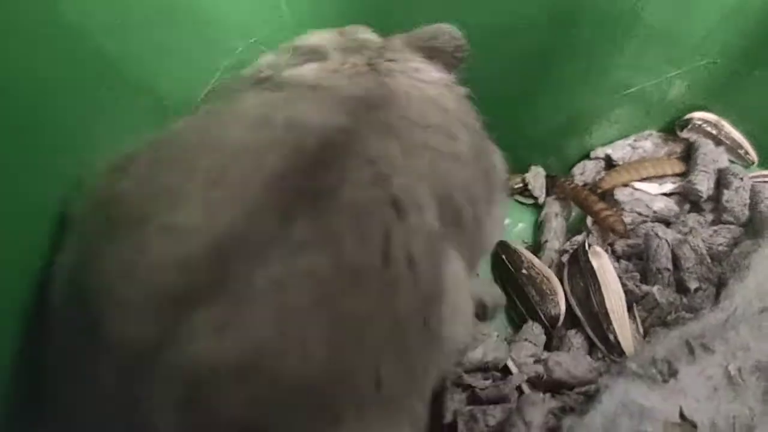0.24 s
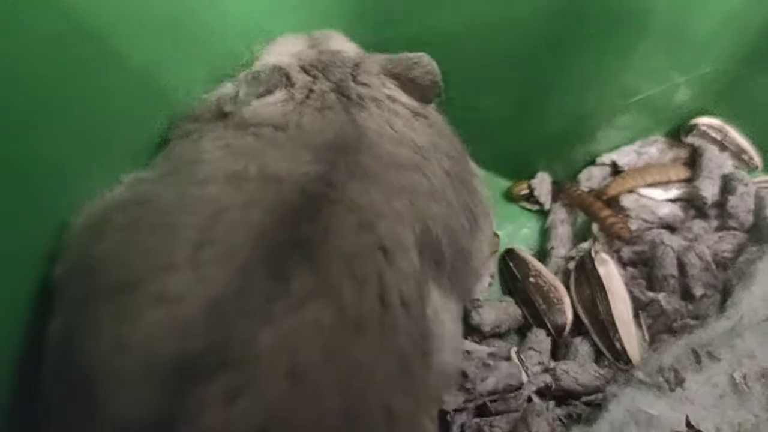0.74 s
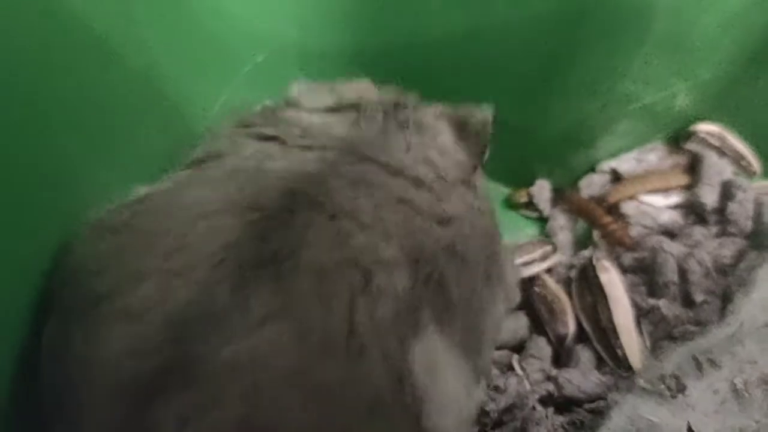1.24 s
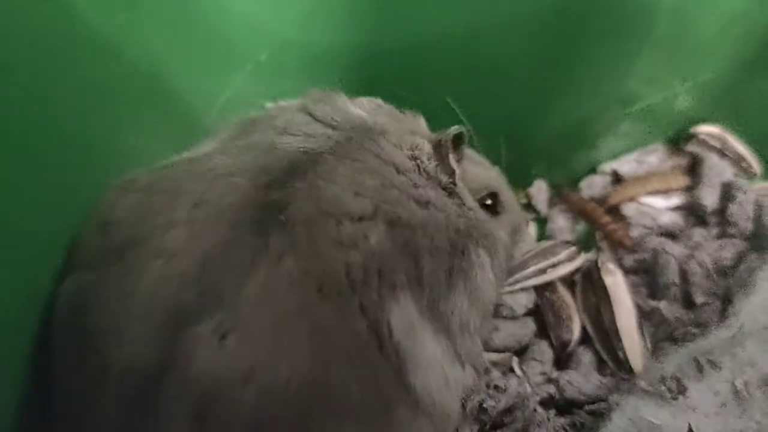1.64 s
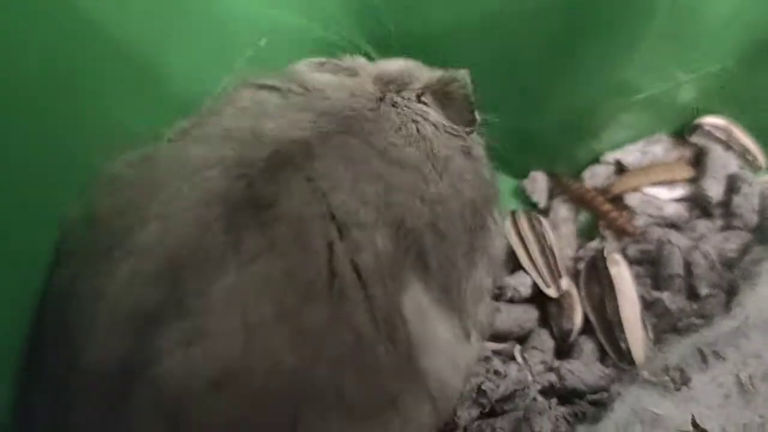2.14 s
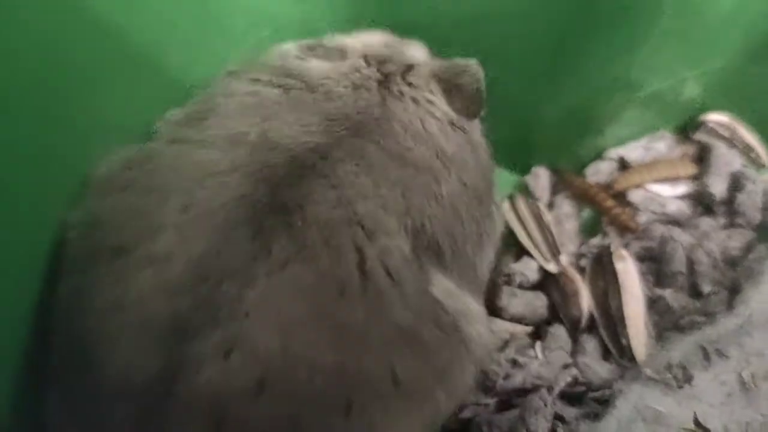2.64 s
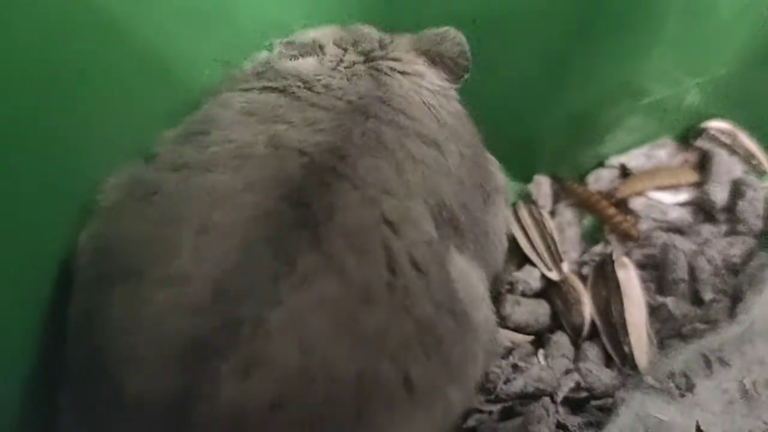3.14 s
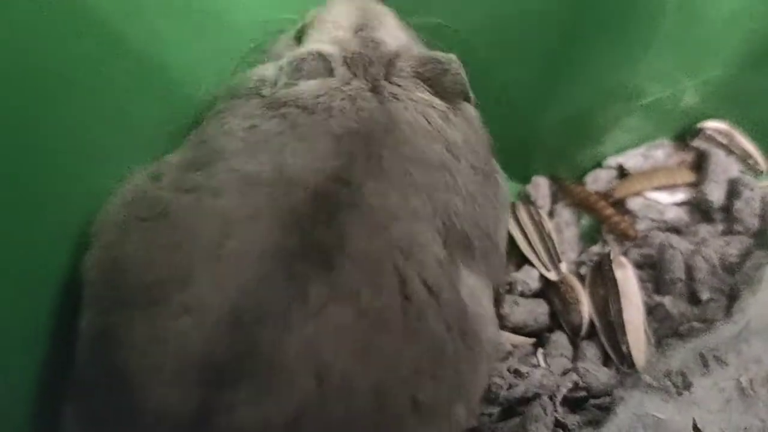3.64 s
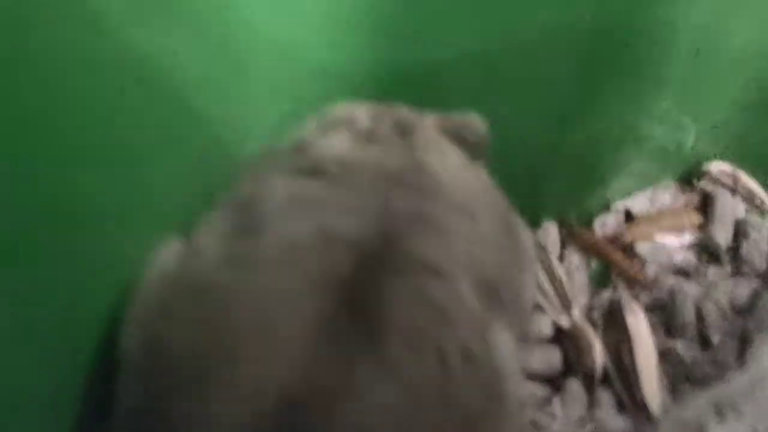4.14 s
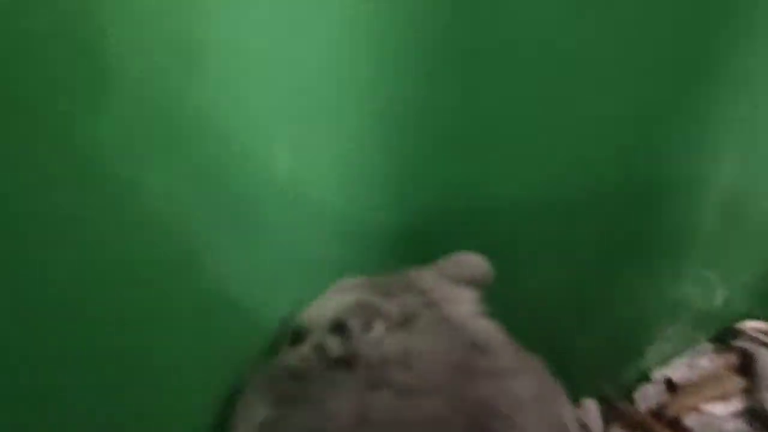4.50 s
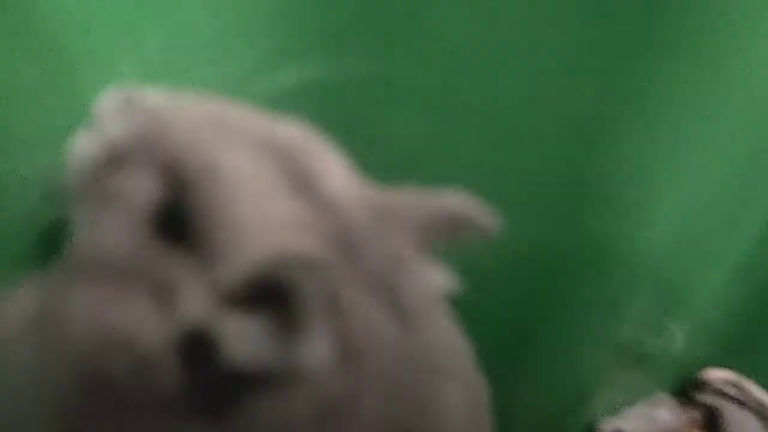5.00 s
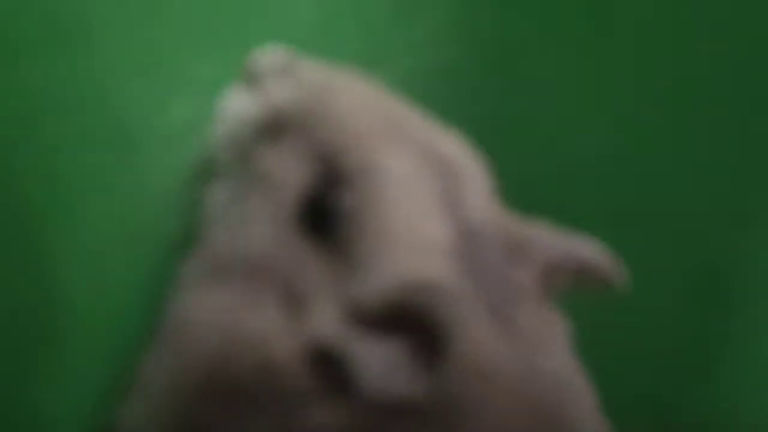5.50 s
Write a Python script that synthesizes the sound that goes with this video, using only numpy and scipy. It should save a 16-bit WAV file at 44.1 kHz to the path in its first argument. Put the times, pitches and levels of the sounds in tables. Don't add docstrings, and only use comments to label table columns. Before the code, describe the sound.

A small rodent shuffles among seeds and pellets in a plastic tub, heard very close. Irregular clicks, soft scrapes and crisp husk cracks sit mostly on the right over faint hum and room hiss. After four seconds a finger over the left microphone creaks, thumps and rubs loudly, while knocks jolt the right.

```python
import sys
import numpy as np
from scipy import signal
from scipy.fft import rfft, irfft
from scipy.io import wavfile
from scipy.ndimage import uniform_filter1d

SR = 44100
rng = np.random.default_rng(int(sys.argv[2]) if len(sys.argv) > 2 else 0)


def volts_from_db(level):
    exponent = np.asarray(level, float) / 20
    return 10 ** exponent


def generate_wav(sig):
    pcm = np.round(np.clip(np.atleast_2d(sig).T, -1, 1) * 32767).astype(np.int16)
    wavfile.write(sys.argv[1], SR, pcm)


N = 254016

# start_s, rolling_db, slipping_db
GRIP = [(0.0, -79, -80), (3.3, -67.5, -81.5), (4.05, -56.5, -80.5), (4.26, -45.5, -81.5), (4.35, -38, -72),
        (4.52, -40.5, -58), (4.6, -32, -54), (4.78, -41, -57), (4.85, -37, -73), (4.92, -45, -52.5),
        (5.04, -31, -52), (5.11, -31, -31.5), (5.18, -46.5, -60.5), (5.3, -58, -65), (5.42, -26.5, -49),
        (5.56, -36, -53), (5.62, -21.5, -47.5), (5.76, -35, -47)]
# start_s, level_db
SNAPS = [(4.467, -56), (4.493, -50), (4.524, -51), (4.58, -57), (4.588, -53), (4.689, -62), (4.733, -50),
         (4.74, -30), (4.748, -47), (4.858, -42), (4.866, -61), (4.953, -58), (4.962, -56), (5.013, -60),
         (5.089, -48), (5.106, -32), (5.114, -46.5), (5.131, -55), (5.164, -62), (5.174, -63), (5.447, -60),
         (5.471, -59), (5.7, -56)]
# start_s, level_db
TAPS = [(0.05, -50), (0.242, -61), (0.356, -71), (0.578, -40), (0.798, -42), (1.353, -31.5), (2.502, -60),
        (2.793, -55), (3.006, -42), (3.669, -65), (3.725, -57), (3.865, -33.5), (3.965, -31.5),
        (4.182, -55)]
# peak_s, level_db, width_s, direction (push 1, suction -1)
SQUEEZES = [(3.869, -29.0, 0.007, -1), (3.905, -25.0, 0.008, -1), (3.965, -23.0, 0.007, -1),
            (3.985, -27.0, 0.007, 1), (4.333, -21.0, 0.009, -1), (4.372, -18.0, 0.009, 1),
            (4.415, -20.0, 0.009, -1), (4.447, -16.0, 0.0055, -1), (4.469, -15.0, 0.016, 1),
            (4.508, -13.0, 0.012, -1), (4.574, -22.0, 0.028, 1), (4.608, -12.5, 0.009, 1),
            (4.63, -5.0, 0.012, -1), (4.676, -8.0, 0.012, 1), (4.698, -14.0, 0.016, 1),
            (4.723, -3.0, 0.007, 1), (4.752, 2.5, 0.015, -1), (4.791, -3.0, 0.016, 1),
            (4.83, -13.0, 0.0055, -1), (4.844, -9.5, 0.007, 1), (4.864, 0.5, 0.009, -1),
            (4.891, -15.0, 0.012, 1), (4.912, -8.0, 0.009, 1), (4.925, -7.5, 0.007, 1),
            (4.948, -15.0, 0.012, -1), (4.968, -3.0, 0.007, 1), (4.986, -7.0, 0.0055, -1),
            (4.998, -8.0, 0.009, -1), (5.036, -17.5, 0.007, -1), (5.059, -3.5, 0.009, 1),
            (5.075, -17.0, 0.007, 1), (5.114, 2.0, 0.014, -1), (5.152, -8.5, 0.016, 1),
            (5.202, -16.0, 0.028, 1), (5.243, -18.0, 0.009, -1), (5.29, -13.5, 0.016, -1),
            (5.338, -20.0, 0.028, 1), (5.39, -22.0, 0.012, -1), (5.442, -14.5, 0.009, 1),
            (5.476, -16.5, 0.021, -1), (5.558, -18.5, 0.012, 1), (5.585, -19.0, 0.006, -1),
            (5.603, -11.5, 0.007, 1), (5.617, -10.5, 0.0055, -1), (5.631, -17.0, 0.005, 1),
            (5.645, -16.0, 0.005, -1), (5.672, -21.0, 0.008, -1), (5.701, -18.5, 0.012, 1),
            (5.726, -16.5, 0.0055, -1)]
# start_s, level_db, start_hz, end_hz, fade_s (to -60 dB), direction (push 1, pull -1)
KNOCKS = [(4.588, -22, 36, 35.5, .55, -1), (4.592, -33, 150, 110, .1, -1), (4.6103, -23, 150, 100, .11, 1),
          (4.617, -22, 45, 40, .06, -1), (4.669, -23, 170, 130, .05, -1), (4.8329, -17, 230, 135, .06, -1),
          (4.833, -24, 36, 25, .8, 1), (4.849, -29, 70, 60, .1, -1), (5.201, -44, 20, 20, .15, -1),
          (5.606, -38, 62, 58.8, .6, 1), (5.704, -27, 50, 45, .14, -1)]
# pitch_hz, level_db, fade_s (to -60 dB)
WALL = [(431, 5, 0.038), (720, -3, 0.14), (860, 1.5, 0.065), (1048, 7.5, 0.071), (1196, 4.5, 0.0023),
        (1366.6, 0, 0.15)]
RIM = [(1800, 17, 0.055), (1880, 9, 0.035), (2400, 3, 0.015), (2650, 9.5, 0.03), (3480, 4, 0.022)]
HUSK = [(4350, -24, 0.00072), (5210, 9, 0.024), (6660, 25.5, 0.0043), (7300, 12, 0.023), (7870, -38, 0.002),
        (11340, -57, 0.0025), (12500, -23, 0.0031)]
# pitch_hz, level_db (per Hz)
PRESSURE = [(3, 11.5), (10, -15.5), (20, 4), (35, 1), (60, -14.5), (120, -39.5), (500, -110)]
RUB = [(35, -21.5), (70, 2), (110, -5.5), (150, -10), (300, -18.5), (600, -34), (4000, -105)]
SCRAPE = [(250, 3), (500, 2), (1000, -7.5), (2000, -17.5), (3000, -24.5), (4500, -41), (9000, -95.5)]
RUMBLE = [(8, 0.5), (30, 16.5), (70, 7), (120, 7.5), (600, -88.5)]
DRONE = [(60, 3.5), (120, 3), (180, 3), (260, -5.5), (380, -12), (550, -30.5), (2000, -97)]
ROOM = [(200, -44), (500, 5.5), (2000, 4.5), (3000, -5), (4500, -24), (7300, -16), (10000, -24.5),
        (16000, -28.5)]
FUR = [(3500, -13.5), (4700, -21), (6000, -13.5), (7500, -10), (8800, -17), (11000, -29), (16000, -29)]
SELF_NOISE = [(100, 44), (900, 19), (1900, 29), (3000, 20), (4500, 12), (16000, 13)]
# pitch_hz, level_db
MUFFLING = [(200, -16), (600, -16.5), (1500, -34), (3000, -33), (4500, -55.5), (7000, -67)]
# pitch_hz, level_db, width_hz
HUMS = [(152, -69, 2), (230.5, -61.5, .5), (306, -76, 3), (460, -76, 1.5)]
# start_s, level_db
PASSING = [
    (0.0, -57),
    (2.2, -56),
    (3.2, -44),
    (4.0, -48.5),
    (4.2, -49),
    (4.45, -45),
    (4.72, -40.5),
    (4.95, -49.5),
    (5.3, -55.5),
    (5.76, -52.5),
]
# start_s, level_db
STIR = [(0.0, -58), (0.5, -58), (1.3, -59.5), (2.3, -61.5), (2.56, -58), (2.72, -62), (3.36, -63),
        (3.84, -58.5), (4.2, -61), (4.5, -60.5), (4.65, -52.5), (4.85, -51), (4.92, -65), (5.15, -59),
        (5.26, -65.5), (5.63, -63.5), (5.7, -52.5), (5.76, -55)]
# start_s, length_s, drag_db, brush_db
STROKES = [(0.274, 0.058, -50.5, -82), (0.303, 0.095, -48, -69), (0.455, 0.048, -72, -85),
           (0.565, 0.087, -58, -74), (0.701, 0.03, -83, -69.5), (0.736, 0.035, -74, -76),
           (0.854, 0.047, -60, -69.5), (0.913, 0.094, -52.5, -70.5), (1.71, 0.061, -59, -75),
           (1.783, 0.12, -64, -71), (2.237, 0.025, -57, -70), (2.45, 0.18, -62.5, -76.5),
           (2.73, 0.095, -58.5, -80), (2.93, 0.041, -65, -78), (3.448, 0.095, -61, -77),
           (3.765, 0.1, -59.5, -67.5), (3.865, 0.013, -51, -72), (4.587, 0.047, -40, -86),
           (4.597, 0.42, -83, -69), (5.087, 0.082, -87, -89), (5.447, 0.043, -83, -82)]
# start_s, wall_db, rim_db
BUMPS = [(0.061, -45.5, -70), (0.103, -48.5, -69), (0.243, -39.5, -64), (0.357, -36.5, -47),
         (1.029, -60, -79), (1.075, -46.5, -78), (1.172, -48, -79), (1.18, -50, -61), (1.251, -46, -68),
         (1.324, -50, -47), (1.469, -51.5, -56), (1.905, -49, -60), (2.471, -42.5, -74), (2.484, -43, -73),
         (2.502, -36, -39), (2.546, -42, -69), (2.552, -51, -51), (3.868, -45, -60), (3.873, -47, -71.5),
         (4.671, -40, -64), (4.806, -42.5, -47), (4.83, -29, -51), (5.738, -64, -62)]
# start_s, wall_db, rim_db
CLAWS = [(0.31, -57, -32.5), (0.454, -49, -48), (0.58, -73, -43), (0.64, -55, -47.5), (0.723, -46, -45),
         (0.774, -50, -46), (0.798, -43, -40), (0.813, -46.5, -44), (0.829, -52, -50), (0.888, -49, -44.5),
         (0.919, -42.5, -41), (0.966, -55, -50), (0.982, -50.5, -65), (1.22, -50, -49), (1.306, -48, -52),
         (1.592, -44.5, -46), (1.782, -50, -55), (1.84, -48, -45.5), (2.003, -45, -49.5), (2.063, -50, -44),
         (2.213, -44, -46.5), (2.513, -42.5, -39), (2.791, -40.5, -43.5), (2.804, -51, -56),
         (4.581, -35, -36.5), (5.721, -56, -51)]
# start_s, rim_db, husk_db
SKIPS = [(0.331, -38, -53), (0.341, -48, -68), (0.588, -41, -55.5), (0.743, -53, -71), (2.872, -54.5, -57),
         (2.998, -56, -58.5), (3.317, -52.5, -57), (3.755, -47, -67), (3.802, -47, -72), (3.81, -46.5, -55),
         (3.98, -33, -47.5), (4.016, -37.5, -60), (4.037, -45, -71), (4.076, -52, -83), (4.103, -47.5, -75),
         (4.129, -50.5, -80)]
# start_s, wall_db, rim_db, husk_db
CRACKS = [(0.076, -42, -38.5, -48.5), (0.29, -47, -60, -57), (0.383, -58, -51, -53.5),
          (0.466, -50.5, -51, -54.5), (0.87, -61, -54, -72), (0.939, -64, -56, -66), (1.736, -65, -66, -54),
          (1.738, -46, -43.5, -51), (1.791, -68, -53, -55.5), (1.802, -55, -54, -48),
          (2.107, -56, -52, -59), (2.132, -53, -54, -58), (2.138, -49.5, -63, -55.5),
          (2.619, -42.5, -30.5, -40.5), (2.749, -48, -49, -64), (2.769, -51, -47.5, -56),
          (3.122, -72, -54, -54.5), (3.458, -40.5, -33, -46.5), (3.602, -38.5, -31.5, -44),
          (3.581, -42, -34, -51.5), (3.648, -35.5, -37, -55.5), (3.721, -36.5, -39, -69),
          (3.782, -46, -39.5, -58), (3.915, -55, -45, -61), (3.937, -39, -28, -44), (3.94, -31, -26, -35.5),
          (4.6, -33.5, -50, -39.5), (4.684, -59, -59, -71), (4.695, -63, -61, -72), (5.699, -41, -51, -58)]
# start_s, level_db
FLECKS = [(0.318, -51), (0.357, -55), (0.417, -74), (0.455, -72), (0.494, -70), (0.529, -70), (0.56, -56),
          (0.676, -73), (0.704, -59), (0.86, -57), (0.899, -68), (0.926, -57), (1.218, -67), (1.314, -76),
          (1.461, -71), (1.747, -58), (1.772, -59), (1.776, -61), (1.81, -72), (1.818, -67), (1.845, -69),
          (1.862, -71), (1.884, -74), (1.906, -71), (1.965, -70), (1.982, -64), (2.064, -67),
          (2.084, -63.5), (2.545, -66), (2.737, -63), (2.893, -68), (3.503, -68), (3.907, -66),
          (3.954, -67), (3.96, -73), (5.212, -74), (5.687, -72), (5.719, -63), (5.737, -63)]
# start_s, wall_db, rim_db
NUDGES = [(0.062, -60, -46.5), (0.19, -59, -57), (0.206, -65, -71), (0.222, -57, -64), (0.231, -53, -66),
          (0.242, -55, -53), (0.445, -56, -65), (0.479, -71, -59), (0.746, -66, -46), (0.906, -64, -56),
          (0.937, -46, -50), (0.974, -56, -57), (0.986, -49, -48), (1.01, -55, -67), (1.016, -48, -65),
          (1.043, -70, -72), (1.17, -49.5, -56), (1.212, -52, -69), (1.308, -50, -73), (1.476, -53, -56.5),
          (1.487, -49.5, -71), (1.492, -64, -68), (1.761, -44, -65), (1.772, -62, -64), (1.912, -72, -54),
          (1.921, -59, -58), (1.926, -54, -66), (1.965, -51.5, -71), (2.4, -51.5, -73), (2.441, -60, -66),
          (2.522, -46.5, -70), (2.53, -57, -52), (2.597, -54, -68), (2.614, -55, -64), (2.721, -66, -62),
          (3.322, -51, -62), (3.765, -68, -51), (3.781, -58, -51), (3.797, -70, -55), (3.852, -50, -64),
          (3.956, -48, -53), (3.973, -64, -54), (4.603, -28, -54), (4.644, -42, -60.5), (4.737, -51, -66),
          (4.748, -61, -64), (4.77, -59, -65), (5.157, -58, -69), (0.104, -65, -59), (0.339, -60, -48),
          (0.927, -47, -42.5), (0.96, -63, -47), (0.995, -58, -60), (1.03, -44, -70), (1.075, -51, -65),
          (3.787, -64, -47), (3.805, -66, -58), (3.816, -63, -43), (4.584, -38, -46), (4.683, -59, -48)]

ROOM_DB, SELF_DB, CASE_DB = -65.5, -73, -60
MOVED_S = 4.5
BUMP_HUSK_DB, CLAW_HUSK_DB, SKIP_WALL_DB = -39, -23, -15


def evened(x):
    return x / np.sqrt(np.mean(x ** 2) + 1e-20)


def read(points, hz):
    f, value = np.transpose(points)
    return np.interp(np.log(hz + 1), np.log(f + 1), value)


def level(rows, index):
    rows = np.array(rows)
    return np.interp(np.arange(N) / SR, rows[:, 0], rows[:, index])


def colour(x, points):
    gain = volts_from_db(read(points, np.fft.rfftfreq(N, 1 / SR)))
    return irfft(rfft(x) * gain, N)


def noise(points, lumpy_db=1.5, lump_s=.02, cap=9):
    size = round(lump_s * SR)
    lumps = evened(uniform_filter1d(uniform_filter1d(rng.standard_normal(N), size), size))
    steady = colour(rng.standard_normal(N), points)
    return evened(steady * volts_from_db(lumpy_db * np.minimum(lumps, cap)))


def between(x, lo_hz, hi_hz, order=2):
    return signal.sosfilt(signal.butter(order, [lo_hz, hi_hz], "band", fs=SR, output="sos"), x)


def add(mix, s, sound):
    part = mix[round(s * SR):][:len(sound)]
    part += sound[:len(part)]


def ring(modes, spread_db, burst_s, damping):
    t = np.arange(2600) / SR
    hz, db, t60 = np.transpose(modes)[:, :, None]
    chance = rng.standard_normal((3, len(modes), 1))
    fade_s = t60 * np.exp(.2 * chance[1])
    strength = volts_from_db(db + spread_db * chance[0] - 60 * damping * t / fade_s)
    tones = np.sin(2 * np.pi * hz * (1 + .012 * chance[2]) * t)
    body = (strength * tones).sum(0)
    grit = rng.standard_normal(400) * np.exp(-t[:400] / burst_s)
    sound = np.convolve(body, grit)
    return sound / np.sqrt(np.mean(sound[:200] ** 2))


def grains(groups, size_db):
    out = np.zeros(N)
    for modes in groups * 4:
        sizes = volts_from_db(size_db * np.minimum(rng.exponential(1, N), 4))
        train = sizes * (rng.random(N) < 770 / 4 / SR)
        out += signal.oaconvolve(train, ring(modes, 3., .0005, damping=1.05))[:N]
    return evened(out)


def strokes(index):
    out = np.zeros(N)
    for row in STROKES:
        u = np.linspace(0, 1, round(row[1] * SR))
        add(out, row[0], volts_from_db(row[index]) * np.minimum(u / 0.053, 1) * (1 - u ** 2))
    return out


def shuffle():
    stir_db = level(STIR, index=1)
    near = np.where(np.arange(N) / SR < MOVED_S, 1, 0.44)
    stir = np.sqrt(np.maximum(volts_from_db(stir_db) ** 2 - volts_from_db(ROOM_DB) ** 2, 1e-9))
    patter = between(grains([WALL, RIM], size_db=3.5), 330, 3200)
    drag = 0.6 * near * patter + 0.45 / np.sqrt(near) * noise(ROOM, lumpy_db=3, lump_s=0.004)
    fur = 1.47 * noise(FUR, lumpy_db=0.5, lump_s=0.0092) + 0.31 * near * grains([HUSK], size_db=0)
    brushing = volts_from_db(-81 + 0.97 * (stir_db + 55))
    return (stir + strokes(index=2)) * drag + (brushing + strokes(index=3)) * fur


def hums():
    hz, out = np.fft.rfftfreq(N, 1 / SR), np.zeros(N)
    for line_hz, db, width in HUMS:
        narrow = rfft(rng.standard_normal(N)) / (1 + ((hz - line_hz) / width) ** 2)
        line = signal.hilbert(irfft(narrow, N))
        out += volts_from_db(db) * evened(line.real / abs(line) ** .8)
    return out


def passing_drone():
    return volts_from_db(level(PASSING, index=1)) * noise(DRONE, lumpy_db=-0.44, lump_s=0.033)


def room():
    return volts_from_db(ROOM_DB) * noise(ROOM, lumpy_db=3.0, lump_s=0.033)


def case_rumble():
    return volts_from_db(CASE_DB) * noise(RUMBLE, lumpy_db=1.0, lump_s=0.17)


def self_noise():
    return volts_from_db(SELF_DB) * noise(SELF_NOISE, lumpy_db=.8, lump_s=0.034)


def grip():
    roll_db, slip_db = level(GRIP, index=1), level(GRIP, index=2)
    held_db, tight_db, still_db = -37, -30, -82.5
    pressure = volts_from_db(np.clip(held_db + 2.25 * (slip_db - still_db), held_db, tight_db))
    out = pressure * noise(PRESSURE, lumpy_db=2.6, lump_s=.06)
    out += volts_from_db(roll_db) * noise(RUB, lumpy_db=4.5, lump_s=0.023)
    return out + volts_from_db(slip_db) * noise(SCRAPE, lumpy_db=3.5, lump_s=0.005, cap=1.4)


def taps():
    out, t = np.zeros(N), np.arange(4000) / SR
    thud = np.sin(2 * np.pi * 220 * t) ** 3 * np.exp(-t / 0.0011)
    for s, db in TAPS:
        add(out, s, volts_from_db(db + 3.0) * thud)
    return out


def tick(modes, spread_db, burst_s, damping, crack_share, ring_share=.8):
    sound = ring(modes, spread_db, burst_s, damping)
    t = np.arange(len(sound)) / SR
    fade = np.exp(-t / .002) + .16 * np.exp(-t / .009)
    crack = rng.standard_normal(len(sound)) * fade
    return ring_share * sound + crack_share * crack


def ticks(rows):
    low, wall, rim, husk, spit = np.zeros((5, N))
    for s, wall_db, rim_db, husk_db in rows:
        damping = 2.5 if s > MOVED_S else 1.
        struck = low if wall_db - rim_db > 20 else wall
        add(struck, s, volts_from_db(wall_db) * tick(WALL, 3., .0012, 2.5 * damping, crack_share=1.78))
        choke = np.interp(rim_db, [-46, -34], [1.1, 1.9])
        crack_share = np.interp(rim_db, [-46, -34], [.7, 1.5])
        leaning = 3.4 < s < 3.74 or 3.9 < s < 3.96
        ring_share = .4 if leaning else .8
        add(rim, s, volts_from_db(rim_db) * tick(RIM, 2., .00015, choke * damping, crack_share, ring_share))
        add(husk, s, volts_from_db(husk_db) * tick(HUSK, 2.5, .0006, 3.2, crack_share=1.77))
        add(spit, s + .0004, volts_from_db([husk_db + 7.5]))
    body = between(low, 270, 870) + between(wall, 500, 2350) + between(rim, 1560, 3600, order=4)
    return body + between(husk, 5050, 8530, order=3) + between(spit, 7700, 13000)


def contacts():
    rows = [(s, wall, rim, wall + BUMP_HUSK_DB) for s, wall, rim in BUMPS]
    rows += [(s, wall, rim, max(wall, rim) + CLAW_HUSK_DB) for s, wall, rim in CLAWS]
    rows += [(s, rim + SKIP_WALL_DB, rim, husk) for s, rim, husk in SKIPS]
    return sorted(rows + CRACKS)


def small_contacts():
    rows = [(s, husk + SKIP_WALL_DB, husk, husk) for s, husk in FLECKS]
    return rows + [(s, wall, rim, max(wall, rim) + BUMP_HUSK_DB) for s, wall, rim in NUDGES]


def squeezes():
    out, t = np.zeros(N), np.arange(N) / SR
    for s, db, width, way in SQUEEZES:
        out += way * volts_from_db(db) * np.exp(-((t - s) / width) ** 2)
    return out


def creak():
    out = np.zeros(N)
    u = np.linspace(0, 1, round(0.13 * SR))
    arch = np.sin(np.pi * u ** 0.736)
    low_hz, top_hz = 65, 92.4
    turns = np.cumsum(low_hz + (top_hz - low_hz) * arch) / SR
    cusps = uniform_filter1d(abs(np.sin(np.pi * turns)) - 2 / np.pi, size=60)
    add(out, 4.19, volts_from_db(-35.5) * np.sqrt(abs(arch)) * cusps * np.pi)
    return out


def snaps():
    jumps, slips, t = np.zeros(N), np.zeros(N), np.arange(4000) / SR
    for s, db in SNAPS:
        kind = jumps if db > -47.5 else slips
        add(kind, s + .0006, volts_from_db(db + 19.5) * np.exp(-t / .004))
    return jumps + 1.3 * between(slips, 140, 2200) + volts_from_db(-17) * slips


def knocks():
    out, t = np.zeros(N), np.arange(SR // 2) / SR
    for s, db, start_hz, end_hz, t60, way in KNOCKS:
        pitch_hz = end_hz + (start_hz - end_hz) * np.exp(-20 * t / t60)
        turns = np.cumsum(pitch_hz) / SR
        add(out, s, way * volts_from_db(db - 60 * t / t60) * np.sin(2 * np.pi * turns))
    return out


def scene():
    tub = shuffle() + ticks(contacts()) + ticks(small_contacts())
    far = hums() + passing_drone()
    right = tub + far + room() + case_rumble() + knocks()
    finger = grip() + taps() + squeezes() + creak()
    muffled = np.roll(colour(tub + far, MUFFLING), shift=14)
    left = finger + muffled + self_noise()
    return np.array([left, right])


def top_cut(x):
    return signal.sosfilt(signal.butter(12, 16820, fs=SR, output="sos"), x)


def record(dry):
    x = .95 * np.tanh(dry / .95)
    x = x + np.array([snaps(), np.zeros(N)])
    x = x * np.sin(np.pi / 2 * np.minimum((N - np.arange(N)) / 500, 1))
    treble_cut = signal.firwin(255, 15900, fs=SR)[None]
    x = signal.oaconvolve(np.pad(x, ((0, 0), (127, 127)), "edge"), treble_cut, "valid")
    return top_cut(x)


dry = scene()
out = record(dry)
generate_wav(out)
```